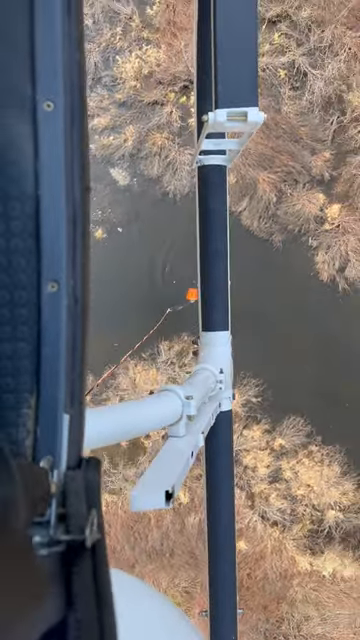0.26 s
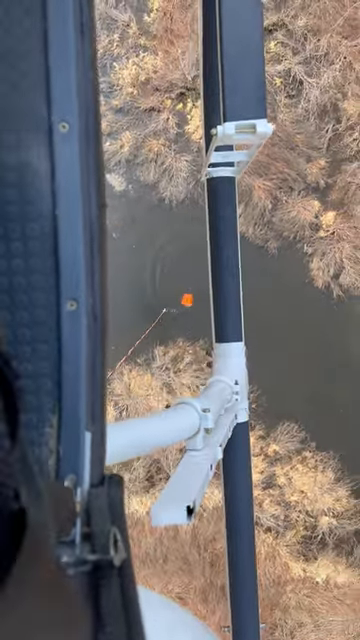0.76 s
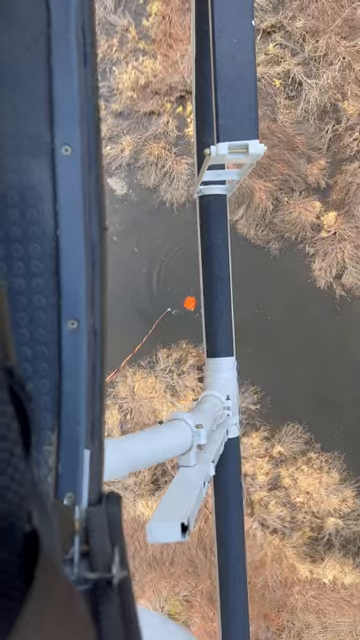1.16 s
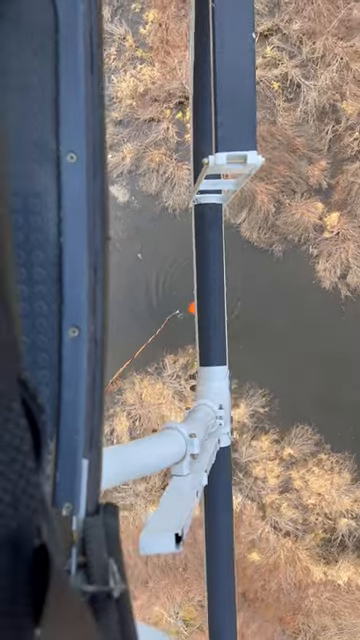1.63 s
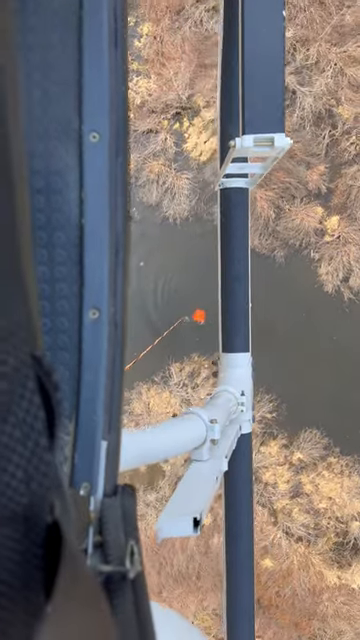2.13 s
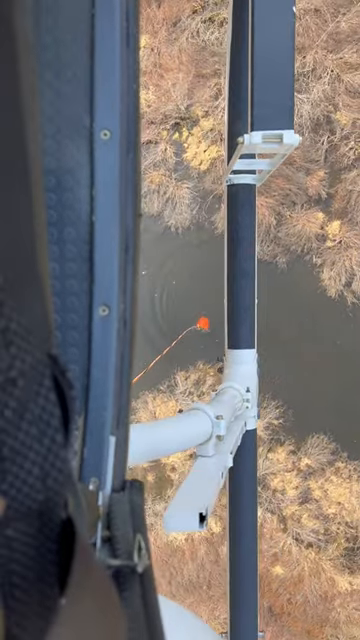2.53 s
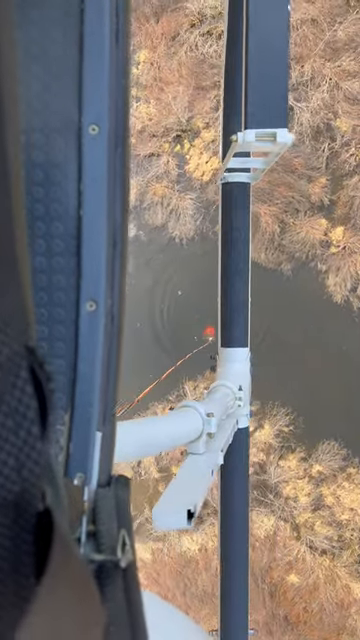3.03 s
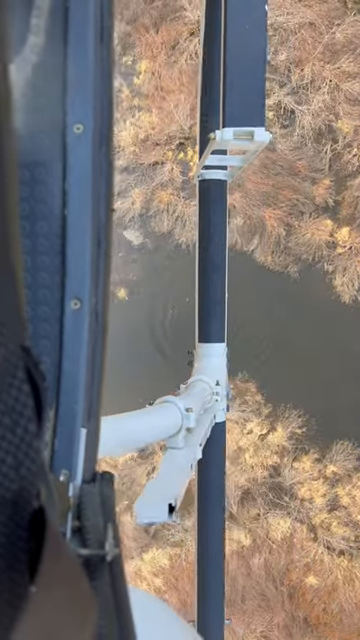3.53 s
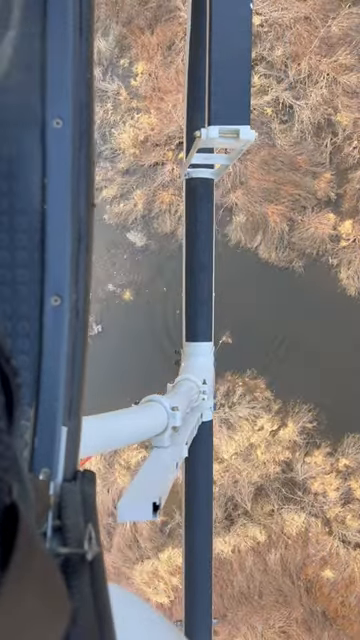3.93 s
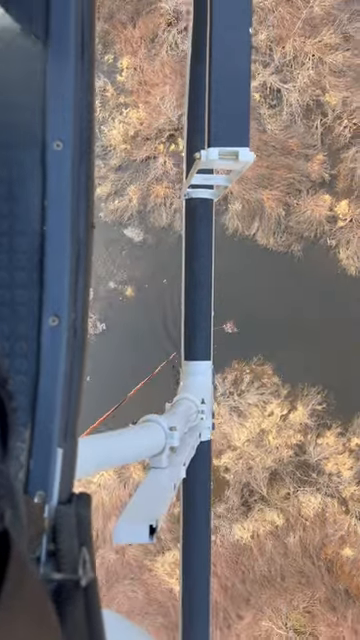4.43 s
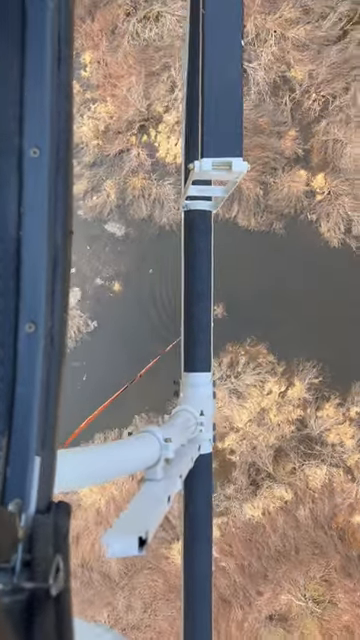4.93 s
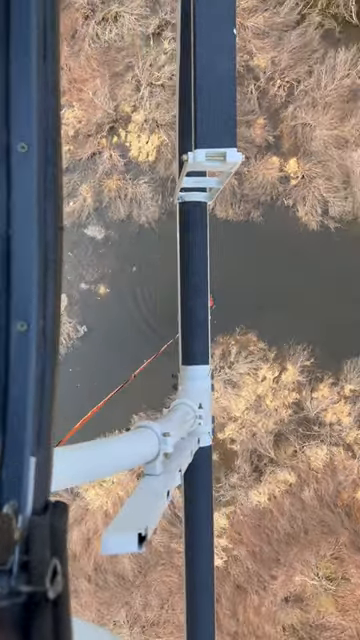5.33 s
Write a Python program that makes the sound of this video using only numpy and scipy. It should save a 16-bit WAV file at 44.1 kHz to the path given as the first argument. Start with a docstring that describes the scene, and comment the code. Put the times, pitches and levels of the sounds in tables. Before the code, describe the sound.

A helicopter hovers low over a river, heard close at its open door. Fast, even blade thumps, about nineteen a second, pound with buffeting wind and rough slaps on the microphone. Around three seconds the wind eases and hollow knocks and whups show through; near five seconds gusts and sharp snaps return. Steady turbine hiss, faint gear whine and tail rotor drone continue throughout.

```python
"""At the open door of a three-bladed helicopter in a low hover, the microphone is held in the downwash.
Each blade sends down a tip vortex, a filtered pulse that thumps past, and a gust, pulsing noise that
buffets the microphone; some vortices hit it squarely as damped swings of pressure with a rough crack.
Behind this the blades knock, chuff and swish (pulses and noise bursts timed by the blade passes),
the tail rotor drones and the gearbox whines (wavering sines), and the turbine hisses (noise)."""
import sys
import numpy as np
from scipy import signal
from scipy.fft import rfft, irfft
from scipy.io import wavfile
from scipy.ndimage import uniform_filter1d, map_coordinates

SR = 44100
rng = np.random.default_rng(int(sys.argv[2]) if len(sys.argv) > 2 else 0)


def wav_record(signal):
    """Record a signal, one row per channel, as 16-bit PCM in the file named by sys.argv[1]."""
    frames = np.transpose(np.atleast_2d(signal))
    bounded = np.clip(frames, -1, 1)
    # unit amplitude maps onto the largest positive 16-bit level
    quanta = np.round(bounded * 32767).astype(np.int16)
    wavfile.write(sys.argv[1], SR, quanta)


N = 245637
T = np.arange(N) / SR
HZ = np.fft.rfftfreq(N, 1 / SR)
BLADE_HZ, BLADES = 19.33, 3  # blade passes per second, blades on the main rotor

# Tip vortices drifting to and from the door. Each row: time in s, arrival in blade periods, relative level in dB.
VORTEX_DRIFT = [(0, 0.63, -12), (.3, 0.56, -13.5), (.5, 0.63, -10), (.85, 0.63, -9.5), (1.0, 0.74, -22),
                (1.15, 0.77, -8.5), (1.5, 0.91, -10.5), (1.7, 0.74, -21), (2.1, 0.86, -15),
                (2.65, 0.91, -20.5), (3.05, 0.97, -14.5), (3.5, 0.96, -19.5), (3.8, 0.92, -15),
                (4.6, 0.91, -14), (5.57, 0.87, -16)]
# Gust under each blade. Each row: time in s, arrival in blade periods, relative depth in dB,
# relative strength on the ports in dB.
BLADE_GUST = [(0, 0.94, 2.5, 4), (.7, 0.8, 0.5, 3.5), (.95, 1, 2, 3.2), (1.45, 0.93, -1.5, 4.5),
              (1.75, 1, 0.2, 2.2), (2.25, 0.82, -0.2, 2.5), (2.6, 0.82, 0.7, 1.4), (3, .95, 3.5, -4),
              (3.5, 0.7, -1, -3), (3.8, 0.59, -0.5, -4), (4.2, 0.62, 1.5, -4), (4.7, 0.52, 3.5, -3),
              (4.9, 0.45, 4.5, 1.5), (5.15, 0.51, 5, 0), (5.35, 0.47, 7, 1.5), (5.57, 0.39, 4.5, 2.5)]
# Downwash at the door, easing then returning. Each row: time in s, relative strength in dB.
DOWNWASH_DRIFT = [(0, 9), (.7, 8.5), (1.1, 6), (1.55, 7.5), (2.3, 3), (2.65, 1), (2.95, -2.5), (3.5, -4.5),
                  (4.1, 0), (4.55, -1), (4.9, 5.5), (5.25, 4), (5.57, 2.5)]
# Spectrum of the thin blade swish. Each row: frequency in Hz, relative density in dB per Hz.
SWISH_SPECTRUM = [(200, -8), (600, 17), (820, 6), (1100, 5), (1500, 5), (2100, -1.5), (2800, 2.5),
                  (4000, -18.5), (5000, -3), (6000, -18.5), (8000, -11), (12000, -10.5)]
# Right channel against left, for wind, air and bass layers; the air layers' top is opposite in phase.
# Each row: frequency in Hz, quieter by dB, phase lag in rad, likeness 0-1.
WIND_STEREO = [(60, 0, 0, .99), (90, 3, .3, .9), (125, 8.5, .7, .8), (160, 9.5, 1.9, .8),
               (210, 10, 2.3, .85), (260, 10, 2.8, .85), (320, 4.5, 2.95, .92), (420, 1.2, 3.14, .98),
               (850, .9, 3.14, .99), (1050, 1, 3.1, .96), (1500, 0, 3.3, .8), (3000, 0, 4.2, .7)]
AIR_STEREO = [(60, 0, 0, .98), (300, 1, 0, .85), (1000, -1, -.3, .6), (1500, -2, -1.2, .5),
              (2000, 0, -.5, .75), (2800, .5, -1.8, .68), (3400, -.5, -1.3, .55), (4000, 0, -.55, .82),
              (5000, 1.3, -1.1, .68), (6000, 0, 0, .995), (7600, 0, 0, .995), (8400, 0, -.5, .8),
              (9800, 0, -1.4, .66), (11200, 0, -2.4, .75), (12100, 0, -np.pi, 1)]
BASS_STEREO = [(60, 0, 0, .99), (300, 2, 0, .85)]


def gain_of(db):
    """Decibels to amplitude."""
    return 10 ** (np.asarray(db) / 20)


def evened(x):
    """Scales to rms 1."""
    return x / np.sqrt(np.mean(x ** 2) + 1e-20)


def curves(rows, at=T):
    """Each column of a time table, joined by straight lines."""
    s, *columns = np.transpose(rows)
    return [np.interp(at, s, c) for c in columns]


def spectra(rows):
    """Each column of a frequency table, joined on a log axis."""
    f, *columns = np.transpose(rows)
    return [np.interp(np.log(HZ + 1), np.log(f + 1), c) for c in columns]


def colour(x, spectrum):
    """Filters by a spectrum in dB, without phase shift."""
    return irfft(rfft(x) * gain_of(spectra(spectrum)[0]), N)


def wander(rate_hz):
    """Smooth chance of rms 1, up to about the given rate."""
    knots = rng.standard_normal(8192)
    return evened(map_coordinates(knots, [2 * rate_hz * T], order=2, mode="wrap"))


def stereo(pair, relation):
    """Two channels: the right carries the left's sound shifted, mixed with a sound of its own."""
    quieter_db, lag_rad, likeness = spectra(relation)
    likeness = np.clip(likeness, 0, 1)
    shared, own = rfft(pair)
    mixed = likeness * shared + np.sqrt(1 - likeness ** 2) * own
    right = mixed * gain_of(-quieter_db) * np.exp(-1j * lag_rad)
    return irfft(np.array([shared, right]), N)


def turbulence(level_db, spectrum, patch_db=0):
    """Two unrelated noises of joint rms 1, one envelope; eddies lift and lower brief patches of the spectrum."""
    z = signal.stft(rng.standard_normal((2, N)), nperseg=256)[2]
    patches = uniform_filter1d(rng.standard_normal(z.shape[1:]), size=9, axis=0)  # across frequency
    patches = evened(uniform_filter1d(patches, size=3, axis=1))  # across time
    noise = signal.istft(z * gain_of(patch_db * patches), nperseg=256)[1][:, :N]
    return evened(colour(noise * gain_of(level_db), spectrum))


def blade_pass(arrival, sharpness, skew=0):
    """One hump per blade, with mean 0 and the power of a unit cosine; skew steepens its front."""
    angle = 2 * np.pi * (BLADE_HZ * T - arrival)
    hump = np.exp(sharpness * np.cos(angle - skew * (1 - np.cos(angle))))
    return evened(hump - hump.mean()) / np.sqrt(2)


def blade_burst(arrival, sharpness):
    """One short swell of height 1 per blade."""
    return np.exp(sharpness * (np.cos(2 * np.pi * (BLADE_HZ * T - arrival)) - 1))


def blade_pulses(table, width_cycles, scatter_db, detune):
    """A few swings of pressure per blade; level and pitch stray from beat to beat."""
    arrival, hz, db = curves(table)
    age_s = ((BLADE_HZ * T - arrival + .5) % 1 - .5) / BLADE_HZ
    cycles = hz * np.exp(detune * wander(11)) * age_s
    wave = np.exp(-(cycles / width_cycles) ** 2) * np.cos(2 * np.pi * cycles)
    return [wave * gain_of(db + scatter_db * wander(8.0)), np.zeros(N)]


def thumps(level_db=2.0, jitter_s=0.000067):
    """Each tip vortex passes as one short push of pressure."""
    # Thump spectrum. Each row: frequency in Hz, relative level in dB.
    thump_spectrum = [(15, -55), (38, -34), (58, -10), (78, -3.5), (98, 7), (117, 9.5), (150, -5), (195, 8),
                      (250, -3.5), (330, -35), (600, -56), (2000, -100)]
    blade = np.arange(int(N / SR * BLADE_HZ))
    arrival, size_db = curves(VORTEX_DRIFT, (blade + 1) / BLADE_HZ)
    late_s = jitter_s * rng.standard_normal(len(blade))
    at = np.round(((blade + arrival) / BLADE_HZ + late_s) * SR).astype(int)
    pushes = np.zeros(N)
    pushes[np.clip(at, 0, N - 1)] = gain_of(size_db)
    pulse_peak = irfft(gain_of(spectra(thump_spectrum)[0]), N)[0]
    pulses = colour(pushes, thump_spectrum) / pulse_peak
    return gain_of(level_db) * stereo([pulses, np.zeros(N)], WIND_STEREO)


def churn(level_db=-30, lead=0.032, sharpness=1.7, follow=0.26, wake_share=0.1):
    """Each tip vortex is wrapped in a burst of churned air; lead in blade periods."""
    # Churned-air spectrum. Each row: frequency in Hz, relative density in dB per Hz.
    churn_spectrum = [(80, -4), (170, -4), (280, 3), (420, -11), (650, -7.5), (1000, -29), (1600, -40),
                      (5000, -91)]
    arrival, size_db = curves(VORTEX_DRIFT)
    burst = blade_burst(arrival - lead, sharpness)
    flow_db = follow * curves(DOWNWASH_DRIFT)[0] + wake_share * size_db
    air = evened(burst * turbulence(flow_db, churn_spectrum))
    return gain_of(level_db) * stereo(air, WIND_STEREO)


def buffeting(level_db=-20, eddy_db=1.0, eddy_hz=110):
    """Downwash on the ports: a gust per blade, broken into small eddies."""
    # Buffet spectrum. Each row: frequency in Hz, relative density in dB per Hz.
    buffet_spectrum = [(50, -79), (90, -22), (130, -4), (200, 1), (280, 1), (400, -4), (600, -8.5),
                       (820, -14), (1020, -19.5), (1300, -29), (1700, -39), (3000, -43), (6000, -66),
                       (12000, -95)]
    arrival, depth_db, strength_db = curves(BLADE_GUST)
    gust_db = depth_db * blade_pass(arrival, sharpness=0.21, skew=0.23)
    flow_db = strength_db + eddy_db * wander(eddy_hz) + gust_db
    return gain_of(level_db) * stereo(turbulence(flow_db, buffet_spectrum, patch_db=2.0), WIND_STEREO)


def slaps(body_db=-2.0, crack_db=-2, body_rise_s=0.0016, crack_rise_s=0.0007, lead_s=0.0029):
    """A vortex hitting a port: a rough crack, then a few heavily damped swings of pressure."""
    # Hits. Each row: time in s (lead_s after onset), relative level in dB, crack against body in dB, pitch in Hz.
    hits = [(0.025, -5, -32, 198), (0.142, -3, -25, 174), (0.305, -4, -23, 260), (0.357, -2.5, -21, 210),
            (0.407, -2, -28, 181), (0.454, -3, -27, 200), (0.666, -6.5, -11, 238), (0.717, -5, -20, 250),
            (1.048, -7.5, -28, 200), (1.228, -8.5, -28, 180), (1.335, -3, -35, 173), (1.354, -8, -30, 220),
            (1.495, -8, -32, 185), (1.55, -1, -23, 226), (2.015, -8.5, -19, 238), (2.119, -10, -27, 217),
            (2.167, -6.5, -24, 223), (2.216, -7.5, -30, 194), (2.266, -6.5, -33, 218),
            (2.451, -6, -22, 274), (2.687, -20, -20, 235), (3.051, -8.5, -13, 225), (3.704, -7, -27, 220),
            (3.851, -5.5, -26, 267), (4.837, -11, -7, 332), (4.882, -8.5, -17, 238), (4.93, -8, -12, 330),
            (5.352, -3, -20, 340), (5.399, -8, -10, 265), (5.497, -3, -18, 127), (5.551, -5, -26, 121)]
    # Crack spectrum. Each row: frequency in Hz, relative density in dB per Hz.
    crack_spectrum = [(300, 6), (550, 17), (1000, 12), (1400, -5), (2500, -12), (5000, -14), (12000, -65)]
    body, crack = np.zeros((2, N)), np.zeros((2, N))
    grit = turbulence(0, crack_spectrum)
    for s, db, bright_db, hz in hits:
        since_s = np.maximum(T - s + lead_s, 0)
        near = (since_s > 0) & (since_s < .05)
        age_s = since_s[near]
        u, v = age_s / body_rise_s, age_s / crack_rise_s
        swing = np.sqrt(2) * np.sin(2 * np.pi * hz * age_s)
        body[0, near] += gain_of(db) * u * np.exp(1 - u) * swing
        crack[:, near] += gain_of(db + bright_db) * v * np.exp(1 - v) * grit[:, near]
    return stereo(gain_of(body_db) * body + gain_of(crack_db) * crack, WIND_STEREO)


def beats(width_cycles=0.74, scatter_db=1.5):
    """The blades' lift presses a slow, deep pulse into the cabin at each pass."""
    # Lift beat. Each row: time in s, arrival in blade periods, pitch in Hz, level in dB.
    lift_beats = [(0, 1.02, 61.7, -21), (1.35, 1, 62.6, -34), (1.7, 1.06, 68, -29), (2.2, 0.994, 67.6, -28),
                  (2.75, 1.12, 69.3, -35), (3.2, 1.08, 73, -27), (4.15, 1.077, 74, -23.5),
                  (5.2, 1.03, 76, -29), (5.57, 0.92, 76, -29)]
    return stereo(blade_pulses(lift_beats, width_cycles, scatter_db, detune=0.094), BASS_STEREO)


def whups(level_db=-1.5, width_cycles=1.33, scatter_db=3.0):
    """The hollow knock of each blade, heard through the air."""
    # Knock. Each row: time in s, arrival in blade periods, pitch in Hz, relative level in dB.
    knocks = [(0, .47, 560, -39), (.7, 0.52, 590, -38), (1.2, .66, 620, -40), (1.95, 0.88, 600, -32),
              (2.3, 0.71, 550, -31), (2.7, 0.63, 577, -35.5), (3, 0.78, 540, -31.5),
              (3.3, 0.52, 560, -26.5), (3.6, 0.58, 477, -42), (3.9, 0.69, 473, -24), (4.55, .7, 483, -26),
              (4.8, 0.49, 454, -34.5), (5.57, 0.49, 440, -37)]
    pulses = blade_pulses(knocks, width_cycles, scatter_db, detune=0.079)
    return gain_of(level_db) * stereo(pulses, AIR_STEREO)


def jolts(width_cycles=1.03, scatter_db=2):
    """Each blade also shoves the air across the ports."""
    # Shove. Each row: time in s, arrival in blade periods, pitch in Hz, level in dB.
    shoves = [(0, 0.7, 282, -15), (.6, 0.75, 280, -27), (1, 0.69, 272, -34), (1.7, 0.82, 237, -17),
              (2.15, 0.96, 197, -19), (2.6, 0.97, 273, -15.5), (3, 0.88, 296, -46), (3.3, 0.77, 283, -10.5),
              (3.9, 0.63, 342, -26), (4.3, 0.7, 330, -28), (4.7, 0.78, 256, -8), (5, 0.45, 304, -42),
              (5.57, 0.3, 280, -20)]
    return stereo(blade_pulses(shoves, width_cycles, scatter_db, detune=0.14), WIND_STEREO)


def chop(level_db=-41, depth_db=6, follow=0.31, glide=0.56, echo=0.72):
    """Each blade's puff has a reflection whose delay shrinks as the blade sweeps by: a hollow, rising 'whup'."""
    # Puff. Each row: time in s, arrival in blade periods, first comb peak at arrival in Hz, relative level in dB.
    comb_puffs = [(0, 0.5, 580, 9), (.9, 0.57, 716, 3), (1.3, 0.75, 640, 3.5), (2.7, 0.89, 675, 1.5),
                  (3.7, 0.68, 510, 3.5), (4.6, 0.73, 520, 3.5), (5, 0.51, 437, 1), (5.57, 0.32, 420, 4)]
    # Puff spectrum before the comb. Each row: frequency in Hz, relative density in dB per Hz.
    chop_spectrum = [(200, -14), (350, 9), (500, 2.5), (650, -3), (820, -11.5), (1200, -14), (1500, -15.5),
                     (1900, -38), (2400, -21), (3500, -43), (5500, -26.5), (12000, -50)]
    arrival, comb_hz, puff_db = curves(comb_puffs)
    sweep = (BLADE_HZ * T - arrival + .5) % 1 - .5
    delay_samples = SR / (comb_hz * np.exp(glide * sweep))
    now = np.arange(N)
    puffs = turbulence(0, chop_spectrum, patch_db=3.5)
    combed = np.array([evened(n + echo * np.interp(now - delay_samples, now, n)) for n in puffs])
    pulse_db = depth_db * blade_pass(arrival, sharpness=0.15, skew=0.04) - depth_db / 2
    flow_db = puff_db + follow * curves(DOWNWASH_DRIFT)[0] + pulse_db
    return gain_of(level_db) * stereo(combed * gain_of(flow_db), AIR_STEREO)


def chuffs(scatter_db=1.5, air_db=-10, stray=0.026):
    """A compact puff of torn air from each blade tip; stray in blade periods rms."""
    # Tip puff. Each row: time in s, arrival in blade periods, tightness (no unit), level in dB.
    tip_puffs = [(0, 0.4, 22, -16.5), (.6, 0.55, 12, -25.5), (1.1, 0.57, 24, -27.5), (1.9, 0.8, 16, -24),
                 (2.45, 0.87, 11, -25.5), (2.7, 0.83, 12, -29), (3.1, 0.95, 10, -30),
                 (3.45, 0.81, 12, -33.5), (4, 0.74, 10, -36), (4.6, 0.63, 10, -37), (5.1, 0.78, 12, -29),
                 (5.57, 0.83, 10, -39)]
    # Tip puff spectrum. Each row: frequency in Hz, relative density in dB per Hz.
    chuff_spectrum = [(300, -7), (550, 8.5), (800, 0), (1130, 4.5), (1400, -9.5), (2000, -15.5),
                      (3000, -18.5), (5000, -25.5), (12000, -65)]
    arrival, tightness, db = curves(tip_puffs)
    burst = blade_burst(arrival + stray * wander(8), tightness) * gain_of(db + scatter_db * wander(5.6))
    puff = turbulence(0, chuff_spectrum, patch_db=6) * burst
    swapped = puff[::-1]  # the two noises change places
    return stereo(puff, WIND_STEREO) + gain_of(air_db) * stereo(swapped, AIR_STEREO)


def crossings(tightness=16, scatter_db=3.0, air_db=-4):
    """A lighter slap as each blade cuts an older vortex drifting through the rotor, a little earlier each time."""
    # Drifting vortices. Each row: start in s, end in s, first and last arrival in blade periods, level in dB.
    old_vortices = [(0, .95, 1.2, 1, -36), (0.798, 1.9, 1.267, 1, -34), (1.955, 2.56, .64, 0.35, -35),
                    (3.548, 4.3, .74, 0.31, -34), (4.05, 4.55, .62, .35, -41),
                    (4.74, 5.57, 0.48, 0.25, -32.5)]
    # Slap spectrum. Each row: frequency in Hz, relative density in dB per Hz.
    crossing_spectrum = [(200, 4), (450, 12), (750, 2), (1100, -5.5), (2100, -3), (2900, -6), (5000, -22),
                         (12000, -57)]
    slap = np.zeros(N)
    for start, end, first, last, db in old_vortices:
        along = np.clip((T - start) / (end - start), 0, 1)
        fade = np.sqrt(abs(np.sin(np.pi * along)))
        slap += gain_of(db) * fade * blade_burst(first + (last - first) * along, tightness)
    slap = slap * gain_of(scatter_db * wander(11))
    on_ports = slap * turbulence(0, crossing_spectrum, patch_db=6)
    in_air = slap * turbulence(0, crossing_spectrum, patch_db=6)
    return stereo(on_ports, WIND_STEREO) + gain_of(air_db) * stereo(in_air, AIR_STEREO)


def huffs(sharpness=2, scatter_db=1.5, stray=0.06):
    """Each blade leaves a rounded, ragged, airy puff, sometimes together with its knock."""
    # Airy puff. Each row: time in s, arrival in blade periods, level in dB.
    airy_puffs = [(0, 0.86, -40), (.7, 0.81, -41.5), (1.3, 0.74, -43.5), (2, 0.7, -50.5),
                  (3.2, 0.75, -50.5), (4.1, 0.7, -51.5), (4.7, 0.75, -54), (5, 0.38, -53), (5.57, 0.4, -41)]
    # Airy puff spectrum. Each row: frequency in Hz, relative density in dB per Hz.
    huff_spectrum = [(900, -40), (1500, -2.5), (1850, 2.5), (2150, 0), (2500, -11), (4000, -35),
                     (8000, -70)]
    arrival, db = curves(airy_puffs)
    late = stray * wander(8)  # blade periods
    swell = blade_burst(arrival + late, sharpness) * gain_of(db + scatter_db * wander(9))
    return stereo(turbulence(0, huff_spectrum, patch_db=4.5) * swell, AIR_STEREO)


def flicks(level_db=-51, arrival=0.758, sharpness=11, scatter_db=2, follow=0.19, stray=0.023):
    """Every blade gives a short swish as it passes the door; arrival and stray in blade periods."""
    burst = blade_burst(arrival + stray * wander(12.0), sharpness)
    flow_db = follow * curves(DOWNWASH_DRIFT)[0] + scatter_db * wander(11)
    swish = evened(burst * turbulence(flow_db, SWISH_SPECTRUM))
    return gain_of(level_db) * stereo(swish, AIR_STEREO)


def snaps(grit_db=-3, spray_db=-7, rise_s=.0009):
    """A blade cuts the vortex of the one before: a pitched snap through the air, a gritty jolt on the ports."""
    # Cuts. Each row: start in s, level in dB, pitch in Hz.
    cuts = [(0.226, -27, 1010), (0.283, -36, 1510), (0.334, -30, 980), (0.385, -26, 900), (0.489, -26, 744),
            (.593, -23, 920), (0.641, -29, 1090), (.87, -27, 940), (.957, -30, 1910), (1.381, -35, 1300),
            (1.428, -30, 815), (1.476, -29, 1380), (2.001, -25.5, 580), (2.112, -29, 785),
            (2.156, -28, 1080), (2.366, -36, 950), (2.572, -36, 1070), (2.63, -30, 740), (2.78, -40, 900),
            (2.985, -35, 1200), (3.036, -38, 980), (3.14, -36, 890), (3.907, -33, 1120),
            (4.099, -29.5, 1990), (4.171, -45, 1110), (4.224, -37, 1100), (4.433, -41, 1100),
            (4.685, -43, 1210), (4.828, -32, 1910), (4.927, -25.5, 870), (4.987, -33, 1920),
            (5.033, -33, 1750), (5.138, -34, 1400), (5.242, -30, 1840), (5.292, -37, 1790),
            (5.443, -26, 880), (5.485, -26, 850), (5.517, -28, 2640)]
    # Grit spectrum. Each row: frequency in Hz, relative density in dB per Hz.
    grit_spectrum = [(300, -12), (600, 26), (1000, 9), (1400, -33), (2000, -22), (3000, -21), (5000, -24),
                     (12000, -69)]
    push, ring = np.zeros(N), np.zeros((2, N))
    for s, db, hz in cuts:
        near = (T > s) & (T < s + .02)
        age_s = T[near] - s
        size = gain_of(db) * age_s / rise_s * np.exp(1 - age_s / rise_s)
        push[near] += size
        ring[0, near] += size * np.sin(2 * np.pi * hz * age_s)
    ring += gain_of(spray_db) * push * turbulence(0, SWISH_SPECTRUM)
    grit = turbulence(0, grit_spectrum) * push
    return stereo(ring, AIR_STEREO) + gain_of(grit_db) * stereo(grit, WIND_STEREO)


def squalls():
    """Short spells of dense roar blow in at the door."""
    # Spells. Each row: centre in s, half width in s, level in dB.
    spells = [(.15, 0.025, -25.5), (5.423, 0.02, -21), (5.504, 0.03, -21)]
    # Roar spectrum. Each row: frequency in Hz, relative density in dB per Hz.
    squall_spectrum = [(30, -31), (85, 6.5), (130, 9), (200, 8), (500, -11), (850, -13), (1200, -23),
                       (2500, -32), (6000, -44), (12000, -70)]
    strength = sum(gain_of(db) * np.exp(-((T - s) / width_s) ** 2) for s, width_s, db in spells)
    return stereo(strength * turbulence(0, squall_spectrum), AIR_STEREO)


def rushing(level_db=-45, gust_share=0.7):
    """Air torn by the blades swishes overhead and rushes round the door frame."""
    # Rush spectrum. Each row: frequency in Hz, relative density in dB per Hz.
    rush_spectrum = [(500, -54), (820, 9), (1100, 1.5), (1550, -3.5), (2000, 0), (2700, -1.5), (3600, -7.5),
                     (4700, -9.5), (6000, -22), (12000, -52)]
    arrival, depth_db, _ = curves(BLADE_GUST)
    gust_db = gust_share * depth_db * blade_pass(arrival, sharpness=1.0, skew=0.19)
    flow_db = curves(DOWNWASH_DRIFT)[0] + gust_db
    return gain_of(level_db) * stereo(turbulence(flow_db, rush_spectrum, patch_db=4), AIR_STEREO)


def rumble(level_db=-31.5, follow=0.33, half_width_s=0.055):
    """The cabin booms with the air at its open door, its level moved by large eddies."""
    # Large eddies. Each row: centre in s, relative rise in dB.
    large_eddies = [(.1, 10), (.4, -3), (.68, 4.5), (1.05, 6), (1.33, 9.5), (3.05, 2.5), (3.57, 2),
                    (4.14, 4.5), (4.92, 6.5), (5.5, -2)]
    # Boom spectrum. Each row: frequency in Hz, relative density in dB per Hz.
    rumble_spectrum = [(10, -56), (22, -42), (36, -18), (65, -2.5), (90, -6.5), (130, -11.5), (250, -15),
                       (400, -44), (800, -20), (3000, -100)]
    swell_db = sum(db * np.exp(-((T - s) / half_width_s) ** 2) for s, db in large_eddies)
    flow_db = follow * curves(DOWNWASH_DRIFT)[0] + swell_db
    return gain_of(level_db) * stereo(turbulence(flow_db, rumble_spectrum), BASS_STEREO)


def tail_rotor(level_db=-1, pass_hz=68.55, waver=0.0036, fade_db=3):
    """A low drone on the tail rotor's blade passes; its partials fade in and out in the moving air."""
    # Partials. Each row: multiple of the blade-pass rate, relative level in dB.
    partials = [(1, -39), (2, -34), (3, -41.5), (4, -31.5)]
    turns = np.cumsum(pass_hz * (1 + waver * wander(2.737))) / SR
    drone = np.zeros(N)
    for k, db in partials:
        drone += gain_of(db + fade_db * wander(2.9)) * np.sin(2 * np.pi * (k * turns + rng.random()))
    return gain_of(level_db) * stereo([np.sqrt(2) * drone, np.zeros(N)], WIND_STEREO)


def gearbox(level_db=-3, waver=0.00428, fade_db=1.0):
    """Thin wavering whines carried through the airframe."""
    # Gear lines. Each row: frequency in Hz, relative level in dB.
    gear_lines = [(1075, -58.5), (1287, -54.5), (1502, -59), (1698, -60)]
    whine = np.zeros(N)
    for hz, db in gear_lines:
        turns = np.cumsum(hz * (1 + waver * wander(18))) / SR
        whine += gain_of(db + fade_db * wander(7.8)) * np.sin(2 * np.pi * turns)
    return gain_of(level_db) * stereo([np.sqrt(2) * whine, np.zeros(N)], AIR_STEREO)


def hiss(level_db=-48.5, follow=0.048, swish_db=1.0, odd_blade_db=1.0):
    """Turbine and blade-tip hiss; one blade is louder, so it also swells once a revolution."""
    # Hiss spectrum. Each row: frequency in Hz, relative density in dB per Hz.
    hiss_spectrum = [(1000, 1), (2500, 4.5), (3600, 3.5), (4650, 9), (5400, 5.5), (6700, 0), (8700, 4.5),
                     (9700, 2.5), (10700, 5), (12300, -1.5), (15700, -6)]
    revolution = np.cos(2 * np.pi * (BLADE_HZ / BLADES * T - .6))
    blades_db = swish_db * blade_pass(0.87, sharpness=0.25) + odd_blade_db * revolution
    flow_db = follow * curves(DOWNWASH_DRIFT)[0] + blades_db
    return gain_of(level_db) * stereo(turbulence(flow_db, hiss_spectrum, patch_db=2.5), AIR_STEREO)


def ticks(rise_s=0.00052):
    """A few small, sharp, bright noise bursts stand out of the hiss."""
    # Ticks. Each row: start in s, level in dB.
    tick_times = [(.785, -34), (1.487, -31.5), (4.889, -36)]
    # Tick spectrum. Each row: frequency in Hz, relative density in dB per Hz.
    tick_spectrum = [(1500, -25), (3500, -1), (4800, 3), (7000, -13.5), (12000, -14)]
    strength = np.zeros(N)
    for s, db in tick_times:
        age = np.maximum(T - s, 0) / rise_s
        strength += gain_of(db) * age * np.exp(1 - age)
    return stereo(strength * turbulence(0, tick_spectrum), AIR_STEREO)


def hollowed(pair):
    """Cuts a narrow, drifting hollow into the sound both channels share; its depth pulses with the blades."""
    # Hollow. Each row: time in s, mean centre in Hz.
    hollow_drift = [(0, 765), (1.3, 830), (2.05, 856), (2.4, 785), (2.9, 910), (3.3, 765), (4.2, 790),
                    (4.8, 775), (5.57, 700)]
    shared = pair.mean(0)
    hz, s, z = signal.stft(shared, SR, nperseg=1024, noverlap=896)
    depth_db = 14 + 9 * np.cos(2 * np.pi * (BLADE_HZ * s - .2))
    centre_hz = curves(hollow_drift, s)[0] + 35 * np.interp(s, T, wander(5))
    dip = np.exp(-((hz[:, None] - centre_hz) / 115) ** 2)
    cut = signal.istft(z * gain_of(-depth_db * dip), SR, nperseg=1024, noverlap=896)[1][:N]
    return pair - shared + cut


def scene():
    """Wind on the microphone over the machine's own noise."""
    rotor = thumps() + churn() + beats() + whups() + jolts() + chop()
    rotor += chuffs() + crossings() + huffs() + flicks() + rushing()
    wind = buffeting() + slaps() + rumble()
    return hollowed(rotor + wind + hiss()) + snaps() + squalls() + tail_rotor() + gearbox() + ticks()


def record(dry, edge_hz=15750):
    """The deepest bass is rolled off and peaks near full scale are rounded; then the band limit."""
    # Microphone bass roll-off. Each row: frequency in Hz, gain in dB.
    bass_rolloff = [(5, -40), (24, -13), (33, -6), (45, 0)]
    trimmed = colour(dry, bass_rolloff)
    rounded = trimmed / (1 + (trimmed / .95) ** 8) ** (1 / 8)
    low_pass = signal.firwin(511, edge_hz, window=("kaiser", 9), fs=SR)
    return signal.oaconvolve(rounded, low_pass[None], "same")


dry = scene()
out = record(dry)
wav_record(out)
```